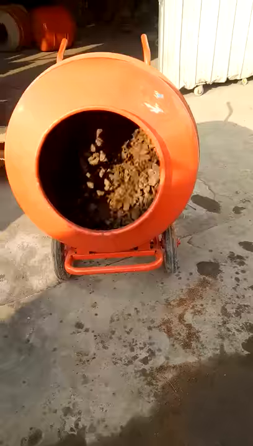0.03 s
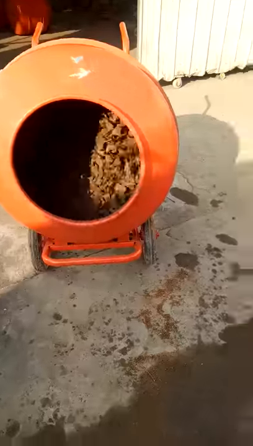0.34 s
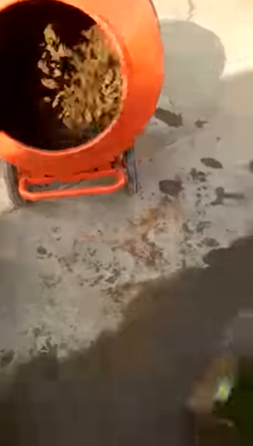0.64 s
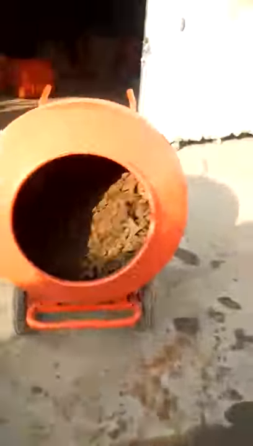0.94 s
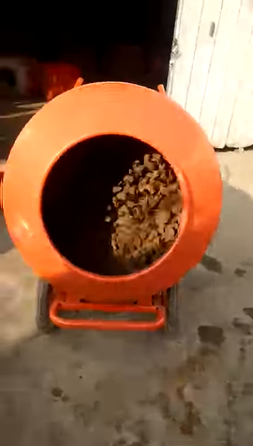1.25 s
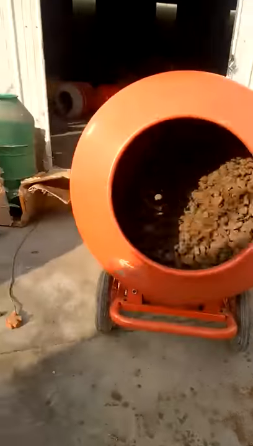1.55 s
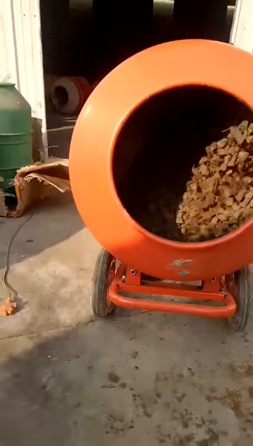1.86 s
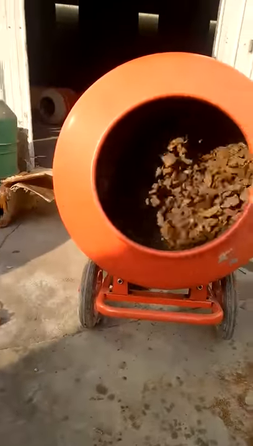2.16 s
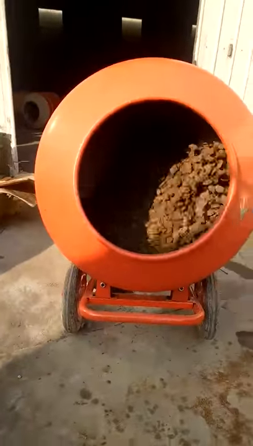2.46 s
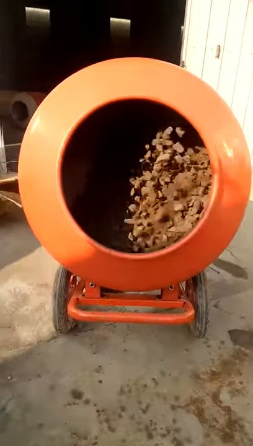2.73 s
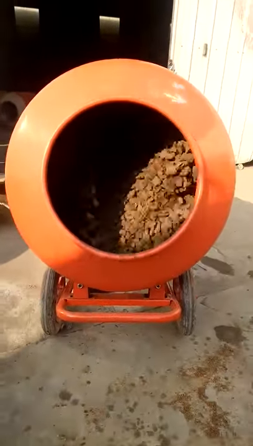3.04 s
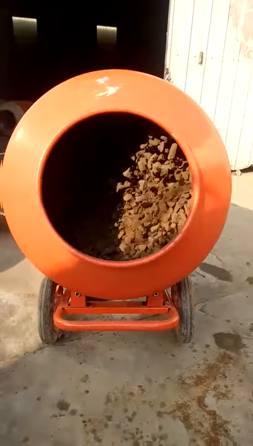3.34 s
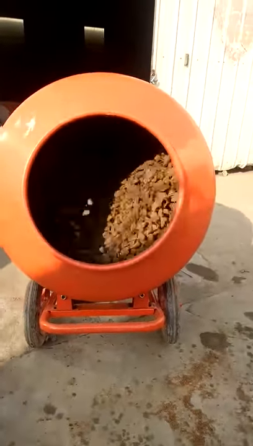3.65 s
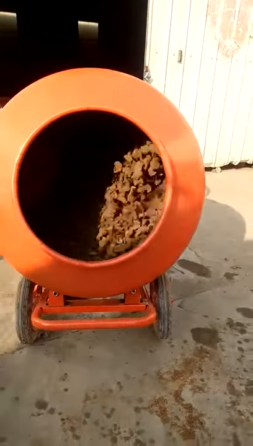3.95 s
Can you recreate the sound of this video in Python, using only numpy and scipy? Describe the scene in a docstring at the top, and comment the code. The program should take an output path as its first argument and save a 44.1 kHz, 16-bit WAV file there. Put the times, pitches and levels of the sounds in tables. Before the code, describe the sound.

A turning concrete mixer churns rattling gravel, with big stones clanking against its steel wall.

```python
"""Stones and gravel tumble in a turning concrete mixer: an open yard, one microphone close to the mouth.
The bed slides without pause over the motor's faint hum, and the paddles drop load after load onto it;
every contact is a short ping that echoes in the steel drum and rings its wall.
Single big stones clank on the steel, dull thumps come between them, and once there is a low, rough groan.
"""
import sys
import numpy as np
from scipy import signal
from scipy.fft import rfft, irfft
from scipy.io import wavfile
from scipy.ndimage import uniform_filter1d

SR = 44100
rng = np.random.default_rng(int(sys.argv[2]) if len(sys.argv) > 2 else 0)


def waveform_to_disk(signal):
    """Save audio, clipped to [-1, 1], as 16-bit WAV at the path in sys.argv[1]."""
    frames = np.transpose(np.atleast_2d(signal))
    scaled = np.clip(frames, -1, 1) * 32767
    samples = np.round(scaled).astype(np.int16)
    wavfile.write(sys.argv[1], SR, samples)


N = 176400
TIME = np.arange(N) / SR
BED_START_S, BED_RISE_S, BED_DB = .082, .064, -23   # the steady slide under the falling loads
FADE_IN = np.clip((TIME - BED_START_S) / BED_RISE_S, 0, 1)


def from_db(db):
    """Decibels to gain."""
    return 10 ** (np.asarray(db) / 20)


def rms_one(x):
    """Scale to unit rms."""
    return x / np.sqrt(np.mean(x ** 2) + 1e-20)


def resonance(x, hz, width_hz):
    """Two-pole band-pass with gain 1 on top."""
    return signal.lfilter(*signal.iirpeak(min(hz, SR * .45), hz / width_hz, fs=SR), x + 1e-18)


def steep_resonance(x, hz, width_hz):
    """Two band-passes in a row, the second twice as wide."""
    return resonance(resonance(x, hz, width_hz), hz, 2 * width_hz)


def blows(rows):
    """One click for each row of (time [s], level [dB])."""
    clicks = np.zeros(N)
    for s, db in rows:
        clicks[int(s * SR)] += from_db(db)
    return clicks


def dying(clicks, decay_s):
    """Each click becomes a sudden rise and an exponential fall."""
    return signal.lfilter([1], [1, -np.exp(-1 / (decay_s * SR))], clicks + 1e-18)


def drum(x, echo_db, t60_s=.06, first_echo_s=.0012):
    """At the mouth: direct sound plus the dense, short echoes from one spot inside the drum."""
    t = TIME[:SR // 5]
    echoes = rng.standard_normal(len(t)) * from_db(-60 * t / t60_s) * (t > first_echo_s)
    return x + from_db(echo_db) * signal.fftconvolve(x, echoes / np.linalg.norm(echoes))[:N]


def flow(showers_per_s=120):
    """Strength of the gravel's movement: bed, falling loads and scatter from big stones add in power."""
    power = (from_db(BED_DB) * FADE_IN) ** 2 + falling_loads()
    landings = rng.exponential(1, N).clip(0, 3) * (rng.random(N) < showers_per_s / SR)
    showers = rms_one(np.sqrt(1 + .55 * dying(landings, decay_s=.005)))   # each stirs its neighbours
    scatter = dying(blows([(s, db) for s, _, _, db in BIG_STONES]), decay_s=.009)
    return np.sqrt(power * showers ** 2 + scatter ** 2)


# Colour of the stones, close to the drum's mouth: (frequency [Hz], gain [dB])
STONE_SPECTRUM = [(70, -16), (120, -20.5), (200, -11.5), (300, -15), (450, -15.5), (650, -13), (920, -13.5),
                  (1100, -10), (1400, -8), (1750, -6), (2400, -3), (3200, -3), (4200, -2), (4800, -4.5),
                  (5700, -6), (6500, -9), (7300, -16.5), (8200, -23.5), (9200, -24.5), (10400, -30),
                  (13800, -29.5)]
def stone_colour(x, size=4096):
    """Causal (minimum-phase) filter through the stones' spectrum, rolled off at its low end."""
    hz, db = np.transpose(STONE_SPECTRUM)
    grid = np.maximum(np.arange(size // 2 + 1) * SR / size, 1)
    gain = from_db(np.interp(np.log(grid), np.log(hz), db)) / np.sqrt(1 + (hz[0] / grid) ** 4)
    cepstrum = irfft(np.log(gain))[:size // 2]
    cepstrum[1:] *= 2
    return signal.fftconvolve(x, irfft(np.exp(rfft(cepstrum, size))))[:N]


# Modes of the steel wall: (frequency [Hz], width [Hz], relative level [dB])
WALL_MODES = [(615, 22, 3), (1031, 42, -0.5), (1166, 25, 0.5), (1304, 14, -4), (1650, 39, 7), (1792, 60, 5),
              (2200, 30, 2), (2870, 60, -30), (4490, 120, -3), (4340, 73, -4), (5595, 80, 1),
              (9120, 140, -2.5), (10000, 180, -1.5)]
def steel_wall(clicks, thickness, lift_db=.5):
    """The contacts ring the wall; a thick flow cushions it."""
    on_steel = clicks / thickness ** .15
    ringing = sum(from_db(db + lift_db) * resonance(on_steel * rng.choice([-1, 1], N), hz, width)
                  for hz, width, db in WALL_MODES)
    return ringing / np.std(clicks)


def gravel(contacts_per_s=4100, pitch_count=96, spot_count=16):
    """Random contacts, denser and harder with the flow, ping stones of many sizes around the drum."""
    low_hz, heavy_hz, high_hz, stone_q = 316.4, 1200, 14580, 8.4
    size_spread_db, tick_share = 3, .22
    strength = flow()
    crowd = (strength / from_db(BED_DB) + 1e-6) ** .8   # multiplies the contact rate; 1 at the bed's level
    sizes = from_db(size_spread_db * np.minimum(rng.exponential(1, N), 4.77)) * rng.choice([-1, 1], N)
    clicks = sizes * (rng.random(N) < contacts_per_s * crowd / SR) * strength / np.sqrt(crowd)
    thickness = rms_one(strength) + .01
    pitch_index = rng.integers(0, pitch_count, N)
    spots = np.zeros((spot_count, N))
    for k, hz in enumerate(np.geomspace(low_hz, high_hz, pitch_count)):
        contacts = clicks * (pitch_index == k)
        if hz < heavy_hz:   # heavy stones move mostly in the falling loads
            contacts *= thickness ** .28
        spots[k % spot_count] += resonance(contacts, hz, hz / stone_q) + tick_share * contacts
    rattle = sum(drum(spot, echo_db=5.5) for spot in spots)
    sound = stone_colour(rms_one(rattle) + steel_wall(clicks, thickness))
    return rms_one(sound) * np.sqrt(np.mean(strength ** 2))


def motor(rumble_db=-52.5, hum_db=-54.5):
    """Motor and gear rumble faintly under the gravel, with a wavering hum."""
    rumble = rms_one(steep_resonance(rng.standard_normal(N), hz=124, width_hz=130))
    hum = rms_one(steep_resonance(rng.standard_normal(N), hz=199.7, width_hz=6.6))
    return (from_db(rumble_db) * rumble + from_db(hum_db) * hum) * FADE_IN


# Big stones on bare steel: (time [s], peak before echoes [dB], ring [Hz], scattered gravel [dB])
BIG_STONES = [(.15, -20, 2240, -17), (0.516, -16.5, 1510, -26), (0.605, -17, 2220, -19),
              (.688, -22, 2370, -17.5), (1.35, -19, 2380, -19), (1.371, -17, 1730, -15),
              (1.654, -12, 1790, -26), (1.96, -19, 2330, -11), (1.974, -11, 2200, -17),
              (2.008, -8, 2260, -26), (2.038, -12, 1750, -20), (2.558, -9.5, 1700, -23),
              (2.603, -7.5, 1800, -14.5), (2.673, -6, 1780, -13.5), (2.706, -7, 1820, -17.5),
              (3.673, -13, 2700, -23), (3.735, -10, 1760, -18), (3.94, -24, 1760, -21)]
def clanks(tick_share=.036):
    """A big stone ticks on the wall and briefly rings the patch that it hits."""
    out = np.zeros(N)
    for s, db, hz, _ in BIG_STONES:
        click = blows([(s, 0)])
        ping = stone_colour(resonance(click, hz, width_hz=79) + tick_share * click)
        out += from_db(db) * ping / np.abs(ping).max()
    return drum(out, echo_db=-3)


# Loads of gravel dropping off the paddles: (time [s], length [s], relative level [dB])
LOADS = [(0.185, 0.12, -18), (0.389, 0.034, -22.5), (0.554, 0.059, -16.6), (0.631, 0.03, -24.5),
         (0.728, 0.01, -18.5), (0.801, 0.051, -18.5), (0.865, 0.1, -16), (0.996, 0.089, -21),
         (1.173, 0.066, -22), (1.271, 0.02, -20.5), (1.344, 0.045, -16.5), (1.405, 0.062, -18),
         (1.49, 0.13, -23), (1.583, 0.033, -20), (1.64, 0.044, -17.5), (1.719, 0.12, -19),
         (1.911, 0.02, -21), (1.974, 0.1, -16.5), (2.199, 0.0081, -21.5), (2.266, 0.013, -21),
         (2.323, 0.069, -17.5), (2.397, 0.043, -16), (2.494, 0.018, -17.5), (2.581, 0.039, -19.5),
         (2.721, 0.066, -19.5), (2.781, 0.041, -16), (2.846, 0.087, -22.0), (2.989, 0.063, -21),
         (3.104, 0.12, -16), (3.291, 0.026, -18.5), (3.442, 0.036, -21), (3.513, 0.066, -15.5),
         (3.66, 0.18, -17), (3.88, 0.091, -23.4)]
def falling_loads(attack_s=.004, release_s=.042, lift_db=.43):
    """Power that the loads add to the flow: each lands suddenly, pours and trickles out."""
    power = np.zeros(N)
    for s, length, db in LOADS:
        attack = np.clip((TIME - s) / attack_s, 0, 1)
        release = np.exp(-np.maximum(TIME - s - length, 0) / release_s)
        power += (from_db(db + lift_db) * attack * release) ** 2
    return power


# Dull thumps between the clanks: (time [s], peak level [dB], slap relative to body [dB])
DULL_BLOWS = [(.596, -23, -20), (0.886, -19, -17), (0.968, -20, -10), (1.683, -16.5, -8),
              (2.341, -15.5, -20), (2.407, -16, -31), (2.415, -8.5, -14), (2.82, -18, -5),
              (3.161, -11, -20), (3.17, -7.5, 4), (3.737, -18, -25), (3.767, -13, -8), (3.797, -14, -10),
              (3.831, -16, -19)]
def thumps(body_hz=103, top_hz=856):
    """Soft, heavy blows: a low body that dies within a cycle or two, and a hollow slap."""
    low_band = signal.butter(2, [body_hz / 2, top_hz], "band", fs=SR, output="sos")
    out = np.zeros(N)
    for s, db, slap_db in DULL_BLOWS:
        click = blows([(s, 0)])
        body = resonance(click, body_hz, width_hz=123)
        slap = from_db(slap_db) * resonance(click, hz=456, width_hz=550)
        thump = signal.sosfilt(low_band, body + slap + 1e-18)
        out += from_db(db) * thump / np.abs(thump).max()
    return out


# Resonances of the groan: (start [s], peak [s], end [s], frequency [Hz], width [Hz], level [dB])
GROAN_MODES = [(1.79, 1.83, 2.22, 379, 13, -36), (1.79, 1.97, 2.04, 280, 14, -35),
               (1.97, 2.17, 2.33, 410, 18, -36), (1.8, 1.97, 2.05, 523, 20, -40),
               (1.94, 2.02, 2.1, 595, 45, -35), (1.96, 2.03, 2.1, 712, 40, -37),
               (1.78, 2.02, 2.4, 350, 170, -36), (1.78, 1.97, 2.1, 115, 90, -39)]
def groan(slips_per_s=400):
    """Uneven slips, as of something rubbing, excite low resonances that each swell and fade."""
    out = np.zeros(N)
    for start, peak, end, hz, width, db in GROAN_MODES:
        slips = (rng.random(N) < slips_per_s / SR) * rng.choice([-1, 1], N)
        tone = steep_resonance(slips, hz, width)
        running_rms = np.sqrt(uniform_filter1d(tone ** 2, size=4000).clip(0) + 1e-14)
        swell = np.sqrt(np.interp(TIME, [start, peak, end], [0, 1, 0]))
        out += from_db(db) * tone / running_rms * swell
    return out


def scene():
    """All sources reach one microphone close to the mouth, the same in both channels."""
    return np.tile(gravel() + clanks() + thumps() + groan() + motor(), (2, 1))


def record(dry, cutoff_hz=13950):
    """After the microphone, peaks are rounded and the highest treble is cut."""
    return signal.sosfilt(signal.ellip(12, .1, 80, cutoff_hz, fs=SR, output="sos"), np.tanh(dry))


dry = scene()
out = record(dry)
waveform_to_disk(out)
```